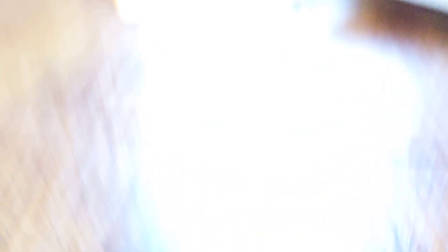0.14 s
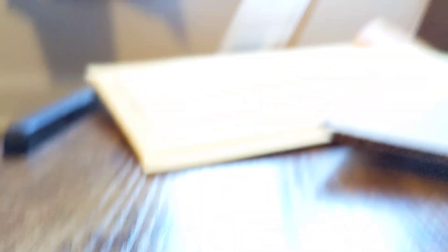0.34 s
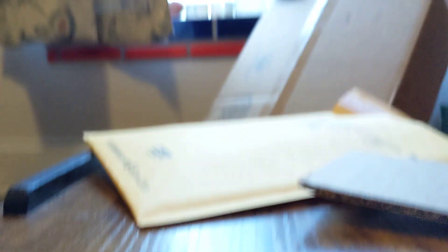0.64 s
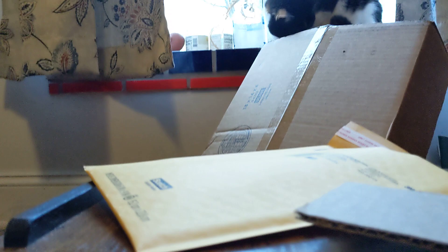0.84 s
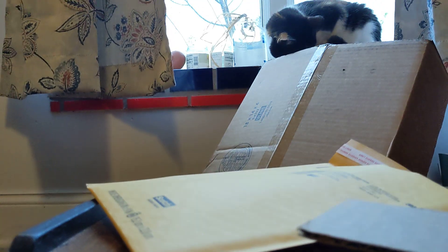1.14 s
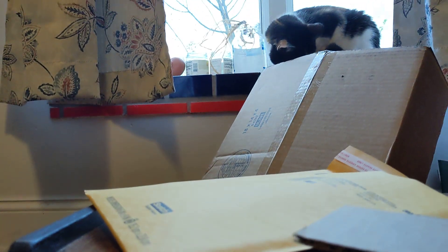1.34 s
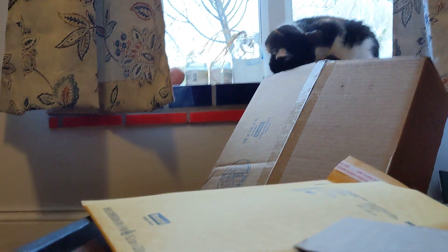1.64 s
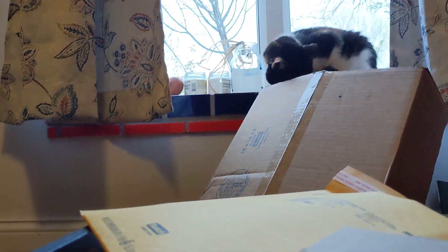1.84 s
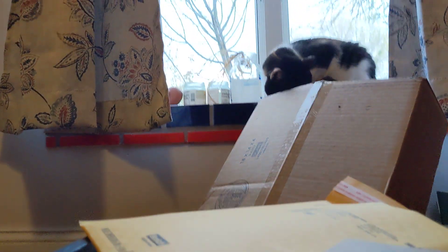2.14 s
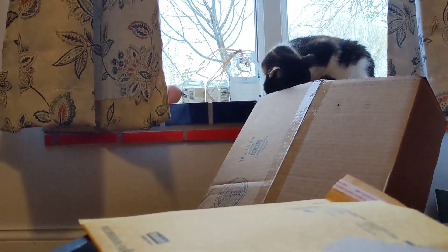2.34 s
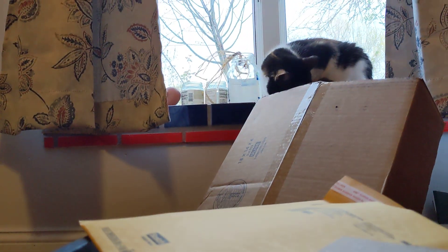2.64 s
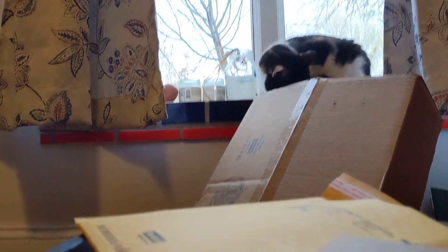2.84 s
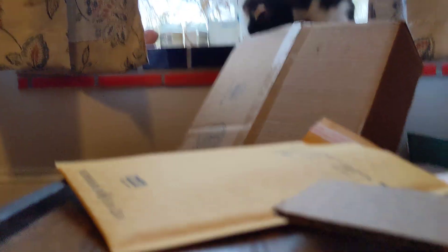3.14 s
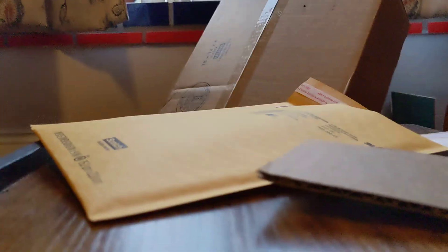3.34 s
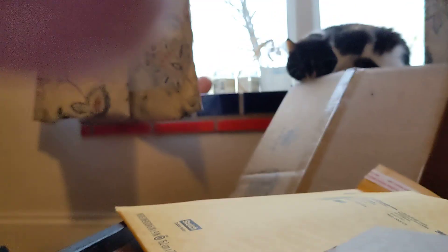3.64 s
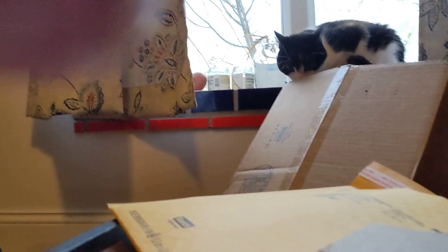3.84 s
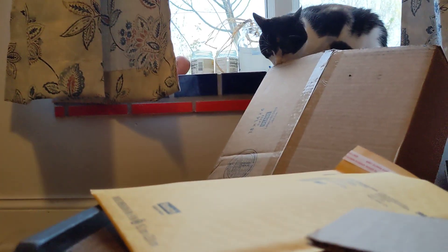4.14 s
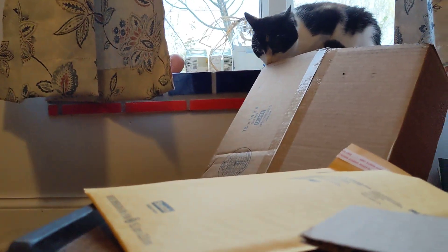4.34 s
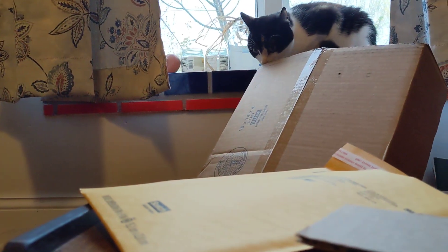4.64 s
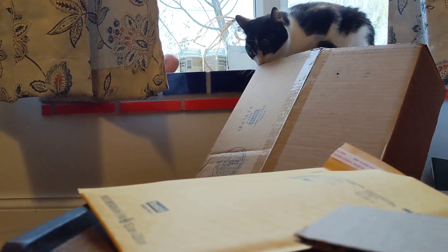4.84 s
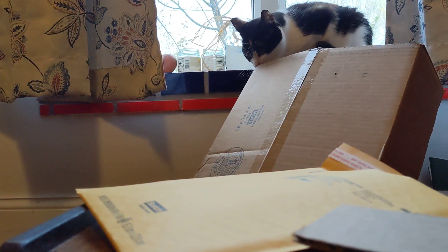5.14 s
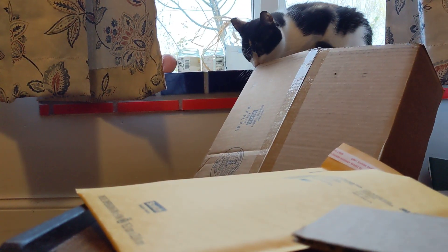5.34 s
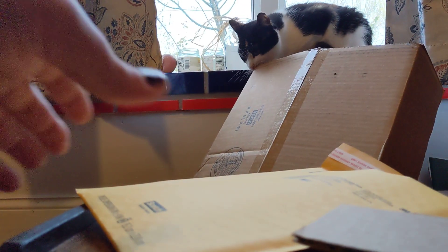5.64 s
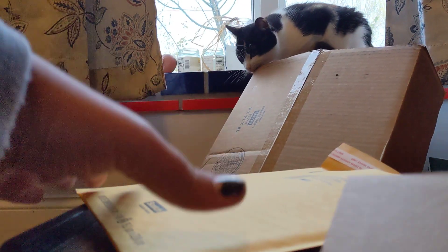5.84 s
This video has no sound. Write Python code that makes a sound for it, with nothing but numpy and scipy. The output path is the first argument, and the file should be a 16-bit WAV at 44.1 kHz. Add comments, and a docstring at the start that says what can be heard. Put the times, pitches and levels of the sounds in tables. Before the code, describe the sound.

A quiet room with a faint low murmur; a small camera's stereo microphones pick up fingers on its own case, close, dry and mainly right-sided. From 0 to 0.5 seconds, strong rough skin rubbing with ringing shell and low bumps. A firm cluster of knock, crack and thump falls at 0.62, then lighter scuffs and a soft tap at 1.1. Sharp clicks come at about 1.55, 1.9 and 2.04, with another tight group at 2.5 and isolated taps between 3.0 and 3.5. Near 3.8 a brief rough judder leads into the loudest, hard, damped knock, followed by fading rubs. Small clicks continue from 4.3 to 4.5, some toward the left. It is then nearly silent, with barely audible paper brushing and a faint thin whine around 5.3. At 5.74 to 5.85 quick hollow cardboard knocks sound with a tiny stick-slip note, ending in a short dry paper swish by 6 seconds.

```python
"""At a table in a quiet room, fingers shift their grip on a small camera beside a padded paper mailer.
Skin rubs, ticks and bumps on the case, mostly close to the right microphone port: friction noise and damped rings.
Towards the end a hand knocks on cardboard, ringing its modes, and slides over the mailer's hissing paper.
A low murmur, a short answer from the walls and a faint thin whine lie behind."""
import sys
import numpy as np
from scipy import signal
from scipy.fft import rfft, irfft, next_fast_len
from scipy.io import wavfile
from scipy.ndimage import map_coordinates

SR = 44100
rng = np.random.default_rng(int(sys.argv[2]) if len(sys.argv) > 2 else 0)


def dump_mix(stems):
    """Bounce the given channels to the path in sys.argv[1] as a 16-bit WAV at rate SR."""
    frames = np.atleast_2d(stems).T  # one column per channel
    limited = np.clip(frames, -1, 1)  # hard clip at full scale
    pcm = np.round(limited * 32767).astype(np.int16)
    wavfile.write(sys.argv[1], SR, pcm)


N = 264600  # 6 s

# Levels in the tables are relative settings; side_db is left over right.
# finger strokes on the case: start_s, length_s, fastest (share of the length), rub_db,
# ring_db (re rub), hiss_db (re rub), brightness (dB per octave)
STROKES = [(-.04, 0.15, 0.75, -39.5, 4.5, -4.5, 0), (.042, 0.055, 0.52, -40.5, 11, -6, -11),
           (0.095, 0.083, 0.41, -49.5, -7, -9.5, -2), (0.142, 0.068, 0.46, -56.5, -2, 6, -4),
           (.17, .25, 0.24, -45, 6, -8, -0.5), (0.367, 0.042, .4, -41.5, 1, -5, 5),
           (0.371, 0.071, 0.86, -42, 2.5, -5, -3), (.42, 0.47, 0.15, -77, -6, 4, -8),
           (0.624, 0.072, 0.49, -45, 3, -4, -6), (0.648, 0.16, 0.58, -50, 1.5, -4.5, -2),
           (0.768, 0.18, 0.12, -69.5, -4, -2, -11), (0.904, .12, 0.55, -50, 2, -4, -4.5),
           (0.99, 0.15, 0.33, -53.5, 2.5, -4.5, -2.5), (1.238, 0.21, .55, -57, -0.5, -4.5, -1.5),
           (1.434, 0.12, .7, -64, -12, -4, -4), (1.565, 0.069, .7, -54.5, -2, 0, 6),
           (1.612, 0.19, 0.54, -47.5, -0.5, -4, 2), (1.703, 0.088, 0.44, -48, 0.5, -1, 1),
           (1.836, 0.14, 0.23, -66.5, -0.5, 1.5, 5), (2.011, 0.093, 0.46, -60.5, -23, -0.5, 0),
           (2.114, .17, 0.65, -50.5, -2.5, -6, 2.5), (2.237, .13, 0.55, -52, -6, -8.5, 0),
           (2.461, 0.042, 0.37, -66, -6, 10.5, 6), (2.496, 0.14, 0.38, -61.5, -3, -0.5, 4),
           (2.607, 0.12, .6, -62, -18, -13, -2), (2.798, 0.079, .25, -66, -10, -4, 3),
           (3.008, .055, 0.46, -66, -14, 0.5, 6), (3.24, 0.17, 0.27, -65.5, -3, -3.5, 1),
           (3.492, 0.15, 0.3, -59.5, -6, -7.5, 4), (3.588, 0.16, 0.59, -51.5, -2, -1, 4),
           (3.709, 0.21, 0.33, -53.5, -13, -10.5, 2), (3.916, 0.086, 0.4, -56.5, -12, -5.5, 1),
           (3.951, 0.25, 0.55, -55, -4.5, -4.5, 2), (4.065, 0.091, 0.6, -56, -2, -1.5, 0),
           (4.13, 0.31, 0.67, -63.5, -10.5, -11.5, 3), (4.395, 0.062, 0.52, -74, -11, 7, 2)]
# a finger judders on the case: centre_s, level_db, spread_s, pitch_hz
JUDDERS = [(2.693, -55, 0.0072, 750), (3.75, -54, 0.023, 745), (3.795, -47, 0.0067, 740),
           (3.817, -32.5, 0.0061, 710), (3.868, -58, 0.038, 704)]
# finger contacts: start_s, tap_db, pitch_hz, crack_db, tick_db, side_db
TAPS = [(0.6197, -28.5, 990, -31, -44, -14), (0.6357, -36, 566, -29, -44, 15),
        (0.6453, -24, 1240, -42, -54, -25), (1.126, -38, 780, -45, -60, -3),
        (1.45, -57, 900, -55, -45, -10), (1.5415, -28.5, 506, -21.5, -26.5, -22),
        (1.5606, -40, 1130, -32, -36.5, -22), (1.577, -35.5, 550, -31.5, -43, -30),
        (1.8513, -29.5, 1020, -30, -36, -18), (1.8595, -35.5, 510, -39, -39.5, -10),
        (1.8927, -46, 1090, -38.5, -37.5, -34), (1.933, -36.5, 507, -40, -46, -34),
        (2.0021, -43, 690, -66, -64, -14), (2.016, -44, 1110, -50, -61, -22),
        (2.0403, -25.5, 1060, -29.5, -41, -5.5), (2.516, -33.5, 860, -36.5, -41, -9),
        (2.5237, -31.5, 527, -27, -33, -17), (2.5447, -26, 1090, -22.5, -29, -46),
        (2.5595, -39, 517, -36, -47, -23), (3.0373, -36, 1150, -32, -55, -34),
        (3.1006, -32.5, 1140, -28.5, -33.5, -30), (3.3639, -35, 1040, -37, -34.5, -6),
        (3.5141, -35, 905, -31, -41, -16), (3.8181, -13.5, 1190, -19.5, -32, -8.5),
        (3.827, -28, 900, -34, -58, 5), (3.92, -46, 1480, -34, -38, -20), (3.9286, -37, 890, -37, -44, -14),
        (4.323, -49, 505, -48, -50, -1), (4.334, -35.5, 494, -35.5, -33.5, 25),
        (4.3763, -42.5, 920, -40, -41, 23), (4.4451, -39, 1200, -34.5, -33, -12),
        (4.5136, -59, 600, -54, -45, -9), (4.904, -61, 600, -55, -52.5, -11),
        (5.21, -63, 570, -48, -43.5, -12)]
# heavier bumps of the hand: start_s, level_db, pitch_hz, t60_s, side_db
BUMPS = [(.008, -35, 190, 0.072, 12), (.056, -41, 340, 0.091, 5), (.083, -26.5, 433, 0.031, -4),
         (0.102, -30, 84, 0.048, -21), (0.395, -33, 190, 0.036, 6), (0.438, -41.5, 119, 0.073, 2),
         (0.6222, -40, 327, 0.034, 1), (0.6228, -18, 194, 0.026, 6), (.637, -37, 524, 0.072, 2),
         (.64, -21.5, 137, 0.058, 2), (1.139, -43.5, 115, 0.096, 7), (1.895, -47, 105, 0.1, -2),
         (2.054, -43.5, 152, 0.089, 16), (3.756, -41, 169, 0.12, 6), (3.823, -16.5, 302, 0.0076, -1),
         (3.83, -21.5, 112, 0.051, 9), (4.341, -33, 143, 0.042, 11)]
# blows on the cardboard: start_s, ring_db, hardness (dB per octave), crack_db
KNOCKS = [(5.7442, -36, -2, -25), (5.8249, -21, 1, -31), (5.846, -38.5, -3, -52),
          (5.882, -51.5, -16.5, -60)]
# the cardboard's modes: pitch_hz, level_db, t60_s
CARDBOARD_MODES = [(215, -14, 0.24), (256, -5.5, 0.1), (544, 0.5, 0.091), (578, -6, 0.069),
                   (615, -15, 0.093), (1035, -10, 0.032), (1317, -1.5, 0.018), (1430, -6.5, 0.03),
                   (1655, -15, 0.051), (2310, -11.5, 0.025), (2480, -27, 0.027), (3000, -31, 0.064),
                   (3260, -18, 0.02)]
# slides over paper: start_s, length_s, fastest (share of the length), hiss_db, body_db
SLIDES = [(5.208, 0.37, 0.46, -67, -64.5), (5.328, 0.087, .6, -66, -70), (5.605, 0.11, 0.38, -67, -84),
          (5.753, 0.122, 0.77, -52, -48), (5.863, 0.098, 0.89, -51, -48.5), (5.935, .095, .55, -42, -54.5)]
# short catches on paper and cardboard: centre_s, rasp_db, paper_db, spread_s, side_db
CATCHES = [(5.34, -57, -75, 0.0022, 11), (5.378, -64, -48.5, 0.0018, 4), (5.742, -39.5, -54, 0.0015, -1),
           (5.752, -48, -55, 0.0088, 1), (5.825, -43.5, -32.5, 0.0035, 1), (5.842, -42, -33, 0.0018, 4)]
# a faint thin whine: start_s, length_s, level_db
WHINES = [(3.414, .22, -74), (5.27, 0.25, -73)]
# resonances of the camera's case: pitch_hz, width_hz, level_db
CASE_MODES = [(1302, 110, 6), (1904, 366, -3), (2290, 130, 4), (2840, 147, -3), (3190, 267, -4),
              (3600, 2000, -28)]
# dull rub of skin on the case: pitch_hz, level_db
SKIN_RUB = [(30, -40), (70, -5), (170, 4), (260, 0), (400, -10), (550, -7), (800, -4), (930, -3.5),
            (1050, 1.5), (1200, -5), (1380, 0), (1550, -18), (2200, -11), (5000, -61)]
# dry hiss of the skin: pitch_hz, level_db
SKIN_HISS = [(1500, 2.5), (3500, 4), (4600, 8), (5900, -3), (7100, 5), (8200, 0.5), (9800, 1.5), (12000, 1),
             (13800, 0.5), (16000, -11)]
# hard crack of a contact: pitch_hz, level_db
CRACK_COLOUR = [(400, 14), (1400, 10), (2200, 18.5), (3100, 10), (4500, 7.5), (5800, 10), (9000, 3.5),
                (16000, -33.5)]
# fine tick of a contact: pitch_hz, level_db
TICK_COLOUR = [(2000, -33), (5000, 10.5), (7000, 12.5), (8500, 10.5), (11000, 7), (14000, 8.5), (16000, -7)]
# hiss of paper: pitch_hz, level_db
PAPER_HISS = [(400, 1), (1500, -1), (2200, -1.5), (2800, 0), (3600, 3), (4500, 3.5), (5600, -2), (6900, 3),
              (9000, 1), (13000, -2.5), (16000, -2)]
# hollow body under the paper: pitch_hz, level_db
HOLLOW_BODY = [(60, -10), (160, 6.5), (235, -6), (330, 2.5), (440, -3), (550, 2), (700, 0), (950, -18),
               (1430, -7), (1800, -13.5), (5000, -31)]
# colour of the room's murmur: pitch_hz, level_db
ROOM_COLOUR = [(20, -63), (40, -17), (60, -0.5), (82, 0.5), (130, -7), (200, -6.5), (270, -7), (370, -16.5),
               (520, -10), (750, -18), (1000, -22.5), (1350, -22), (1700, -29), (4000, -29), (7000, -32.5),
               (10500, -37.5), (16000, -35.5)]
# left-right likeness of the murmur: pitch_hz, likeness (below 0 counts as 0)
ROOM_LIKENESS = [(60, 0.78), (180, 0.96), (550, 0.54), (1650, -1.2), (4970, -0.09), (15000, -0.05)]
# decay of the room's answer: pitch_hz, t60_s
WALL_DECAY = [(100, 0.9), (1000, 0.17), (5000, 0.33), (15000, 0.05)]

TOP_HZ = 16100
REST_DB = -79  # fingers resting on the case, before the lifts in rubbing()
GRIP_SIDE_DB = -9.5  # left over right: the fingers lie beside the right port
THUMP_DB, THUMP_DB_PER_OCTAVE = -10.5, -4.5  # shake re a 700 Hz tap; duller taps shake the camera more
EDGE_DB, EDGE_HOLD_S, EDGE_RELEASE_S = -34.5, 0.027, 0.0071
ATTACK_S, RELEASE_S = 0.025, 0.03  # every stroke takes hold and lets go
ARCH_DB, ARCH_POWER = 9.5, 1.28  # drop from fastest moment to slow ends; roundness of that arch


def rubbing():
    """Skin drags over the case: a dull rub, the shell's ring and a dry hiss share one uneven grip."""
    # power of rub, ring, hiss and top octave; the resting floor stops as the last stroke starts
    resting = np.arange(N) / SR < STROKES[-1][0]
    power = np.ones((4, 1)) * amp(REST_DB) ** 2 * resting
    for start, length, fastest, rub_db, ring_db, hiss_db, bright_db in STROKES:
        # brightness tips the hiss towards its top octave
        gains = amp(rub_db + np.array([0, ring_db, hiss_db - bright_db / 2, hiss_db + bright_db]))
        power += np.outer(gains ** 2, stroke(start, length, fastest) ** 2)
    rub_gain, ring_gain, hiss_gain, air_gain = np.sqrt(power)

    rub = amp(2) * rub_gain * friction(colour(SKIN_RUB), alike=0.28, grit=0.63, rate=450)
    shell = ring_gain * friction(case, alike=0.27, grit=0.76, rate=770)
    skin = friction(colour(SKIN_HISS), alike=0.19, grit=0.46)
    air = filtered(skin, lambda hz: 1 - 1 / (1 + (hz / 9500) ** 6))
    hiss = amp(0.98) * ((skin - air) * hiss_gain + air * air_gain)
    uneven_grip = amp(1.15 * wobble(45) + 0.89 * wobble(260))
    drag = (rub + shell + hiss) * uneven_grip
    # the bass travels through the whole case and reaches both ports
    bass = filtered(drag, lambda hz: 1 / (1 + (hz / 520) ** 4))
    return (drag - bass) * pan(GRIP_SIDE_DB) + bass * pan(-0.061)


def stroke(start, length, fastest=.5):
    """The gain of one movement: it takes hold, swells to its fastest moment, slows and lets go."""
    t = np.arange(N) / SR - start
    inside = (t > 0) & (t < length)
    t, gain = t[inside], np.zeros(N)
    take_hold = np.sin(np.pi / 2 * np.minimum(t / ATTACK_S, 1))
    let_go = np.sin(np.pi / 2 * np.minimum((length - t) / RELEASE_S, 1))
    slowness = np.interp(t / length, [0, np.clip(fastest, 0, 1), 1], [1, 0, 1])
    gain[inside] = take_hold * let_go * amp(-ARCH_DB * slowness ** ARCH_POWER)
    return gain


def friction(response, alike, grit, rate=900, size_db=4):
    """Stereo friction of rms 1: noise of tiny slips and some larger ones, rate a second, through a body."""
    slips = (rng.random((2, N)) < rate / SR) * rng.standard_normal((2, N))
    slips *= amp(size_db * np.minimum(rng.exponential(size=(2, N)), 3))
    a, b = rng.standard_normal((2, N)) + grit * unit(slips)
    # mixing by this angle sets the left-right likeness
    turn = np.arccos(np.clip(alike, 0, 1)) / 2
    return unit(filtered(np.cos(turn) * a + np.sin(turn) * np.array([b, -b]), response))


def case(hz):
    """The ringing of the camera's shell: resonances summed with alternating sign."""
    total = 0
    for k, (centre, width, db) in enumerate(CASE_MODES):
        damping = 1j * hz * width
        total = total + (-1) ** k * amp(db) * damping / (centre * centre - hz * hz + damping)
    return total


def juddering():
    """Where skin sticks and slips quickly, the rub gathers into a short rough note."""
    notes = np.zeros((2, N))
    for s, db, spread, hz in JUDDERS:
        notes += amp(db) * swell(s, spread) * friction(band(hz, width_hz=170), alike=.8, grit=.5)
    return notes * pan(-0.086)


def tapping(scuff_db=-22):
    """Each finger contact is a dead knock with a crack, a fine tick and a tiny scuff, and shakes the camera."""
    out, t = np.zeros((2, N)), np.arange(2048) / SR
    crack, tick = snap(CRACK_COLOUR), snap(TICK_COLOUR)
    # the scuff starts just before the blow, peaks close to it and peels off
    touch = np.exp(-np.abs(t - .003) / 0.00068) + 0.29 * np.exp(-t / 0.0086)
    for s, tap_db, hz, crack_db, tick_db, side_db in TAPS:
        tap = ring(hz, t60=4.47 / hz, attack=0.00023) + 0.22 * ring(1315, t60=0.018, attack=0.00057)
        add(out, s, amp(tap_db + 5.0) * tap * pan(side_db))

        click = amp(crack_db) * crack + amp(tick_db + 3.5) * tick
        add(out, s + 0.00022, -click * pan(side_db * 0.7))

        scuff = signal.fftconvolve(rng.standard_normal((2, len(t))) * touch, click[None], axes=1)
        add(out, s - .0027, amp(scuff_db) * scuff * pan(side_db * 0.53))

        thump = ring(220.4, t60=0.034, attack=0.00059) + 0.59 * ring(105, t60=0.12, attack=0.012)
        thump_db = tap_db + THUMP_DB + THUMP_DB_PER_OCTAVE * np.log2(hz / 700)
        add(out, s, amp(thump_db) * thump * pan(side_db * 0.6))
    return out


def bumping():
    """The soft hand rocks the camera: a low, damped ring with a soft start."""
    out = np.zeros((2, N))
    for s, db, hz, t60, side_db in BUMPS:
        add(out, s, amp(db + 2.0) * ring(hz, t60, attack=0.0026) * pan(side_db))
    return out


def knocking():
    """Each blow rings the cardboard's hollow modes; a harder touch favours the high ones."""
    out, crack = np.zeros((2, N)), snap(CRACK_COLOUR)
    for s, db, hardness_db, crack_db in KNOCKS:
        for hz, mode_db, t60 in CARDBOARD_MODES:
            # every blow excites and places each mode a little differently
            level_db, side_db = rng.standard_normal(2)
            gain = amp(db + mode_db + level_db + hardness_db * np.log2(hz / 540))
            add(out, s, gain * ring(hz, t60, attack=0.0018) * pan(5.7 * side_db))
        add(out, s, amp(crack_db) * crack)
    return out


def edge_note(pitch_hz=600, unsteady=0.53):
    """From the first blow the cardboard's edge sticks and slips, holding a short unsteady note."""
    t = np.arange(N) / SR - KNOCKS[0][0]
    gain = (t > 0) * amp(EDGE_DB) * np.exp(-np.maximum(t - EDGE_HOLD_S, 0) / EDGE_RELEASE_S)
    return gain * np.sin(2 * np.pi * pitch_hz * t + unsteady * wobble(150))


def sliding():
    """Paper hisses over a hollow body under the sliding touch, which catches briefly here and there."""
    hiss_gain, body_gain = np.zeros((2, N))
    for start, length, fastest, hiss_db, body_db in SLIDES:
        movement = stroke(start, length, fastest)
        hiss_gain += amp(hiss_db) * movement
        body_gain += amp(body_db) * movement
    hiss = friction(colour(PAPER_HISS), alike=0.06, grit=0.68, rate=2800)
    hiss = hiss_gain * amp(1.1 * wobble(100)) * hiss * pan(1.6)
    body = body_gain * friction(colour(HOLLOW_BODY), alike=0.99, grit=0.32)

    rasp = friction(band(2760, width_hz=2500), alike=0.13, grit=0.47)
    paper = friction(colour(PAPER_HISS), alike=0.055, grit=0.46)
    catches = np.zeros((2, N))
    for s, rasp_db, paper_db, spread, side_db in CATCHES:
        catches += (amp(rasp_db) * rasp + amp(paper_db) * paper) * swell(s, spread) * pan(side_db)
    return hiss + body + catches


def walls(x):
    """The room's short answer: decaying noise whose bass lingers and whose top treble dies first."""
    hz, t, z = signal.stft(rng.standard_normal((2, SR // 2)), SR, nperseg=256)
    decay = amp(-60 * t / along(WALL_DECAY, hz)[:, None])
    tail = signal.istft(z * decay, SR, nperseg=256)[1]
    return signal.fftconvolve(x, tail / np.linalg.norm(tail[0]), axes=1)[:, :N]


def whine():
    """A thin, fuzzy line of treble that comes and goes: narrow-band noise."""
    gain = sum(amp(db) * stroke(start, length) for start, length, db in WHINES)
    return gain * friction(band(4400, width_hz=190), alike=0.17, grit=0)


def room_tone(level_db=-61.5):
    """The room's steady low murmur: coloured noise, nearly alike at both ports in the bass."""
    def response(hz):
        turn = np.arccos(np.clip(along(ROOM_LIKENESS, hz), 0, 1)) / 2
        return colour(ROOM_COLOUR)(hz) * [np.cos(turn), np.sin(turn)]
    mid, side = filtered(rng.standard_normal((2, N)), response)
    return amp(level_db) * unit(np.array([mid + side, mid - side]))


def amp(db):
    """Decibels to gain."""
    return 10 ** (np.asarray(db) / 20)


def unit(x):
    """Scale to rms 1."""
    return x / np.sqrt(np.mean(x ** 2) + 1e-20)


def along(points, hz):
    """Interpolate (Hz, value) points on a log frequency axis."""
    f, v = np.transpose(points)
    return np.interp(np.log(hz + 1), np.log(f + 1), v)


def wobble(rate):
    """A smooth random curve, rate knots a second."""
    return map_coordinates(rng.standard_normal(int(N * rate / SR) + 4), [np.arange(N) * rate / SR])


def filtered(x, response):
    """Filter x by a complex response of frequency."""
    size = next_fast_len(N + SR // 2)
    return irfft(rfft(x, size) * response(np.fft.rfftfreq(size, 1 / SR)), size)[..., :N]


def colour(points):
    """The gain of a (Hz, dB) spectrum."""
    return lambda hz: amp(along(points, hz))


def band(centre_hz, width_hz):
    """The gain of a resonance with steep skirts."""
    return lambda hz: 1 / (1 + ((hz - centre_hz) / width_hz * 2) ** 2)


def swell(s, spread):
    """A brief bell-shaped rise and fall around time s."""
    return np.exp(-((np.arange(N) / SR - s) / spread) ** 2 / 2)


def snap(points, size=2048):
    """A causal click of peak 1 with the given spectrum."""
    # folding the cepstrum gathers the energy at the start (minimum phase)
    cepstrum = irfft(np.log(colour(points)(np.fft.rfftfreq(size, 1 / SR))))
    cepstrum[1:size // 2] *= 2
    cepstrum[size // 2 + 1:] = 0
    click = irfft(np.exp(rfft(cepstrum)))
    return click / np.abs(click).max()


def ring(hz, t60, attack):
    """A damped sine with a soft start; t60 and attack in seconds."""
    t = np.arange(SR // 2) / SR
    return np.sin(2 * np.pi * hz * t) * 1000 ** (-t / t60) * (1 - np.exp(-t / attack))


def pan(balance_db):
    """Left and right gains of mean power 1."""
    gains = amp(np.array([balance_db, -balance_db]).reshape(2, -1) / 2)
    return gains / np.sqrt(np.mean(gains ** 2, axis=0))


def add(out, s, sound):
    """Mix a sound in at time s."""
    start = max(0, round(s * SR))
    part = sound[..., :max(0, N - start)]
    out[:, start:start + part.shape[-1]] += part


def scene(left_lag_s=0.0003225):
    """Sounds on the case are nearly dry and reach the left port later; the table sends more to the walls."""
    left, right = rubbing() + juddering() + tapping() + bumping()
    near = np.array([filtered(left, lambda hz: np.exp(-2j * np.pi * hz * left_lag_s)), right])
    table = knocking() + edge_note() + sliding()
    return near + table + walls(amp(-24) * near + amp(-16) * table) + whine() + room_tone()


def record(dry, low_hz=48):
    """The camera's microphones cut the deepest bass and keep nothing above the band limit."""
    thin = signal.sosfilt(signal.butter(3, low_hz, "highpass", fs=SR, output="sos"), dry)
    return filtered(thin, lambda hz: hz < TOP_HZ)


dry = scene()
out = record(dry)
dump_mix(out)
```